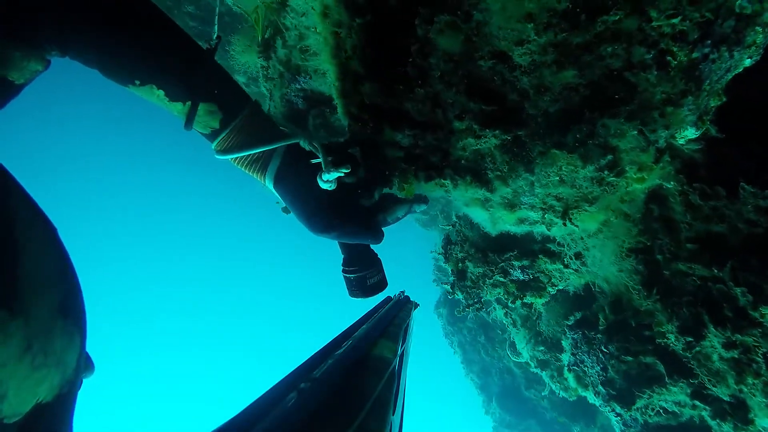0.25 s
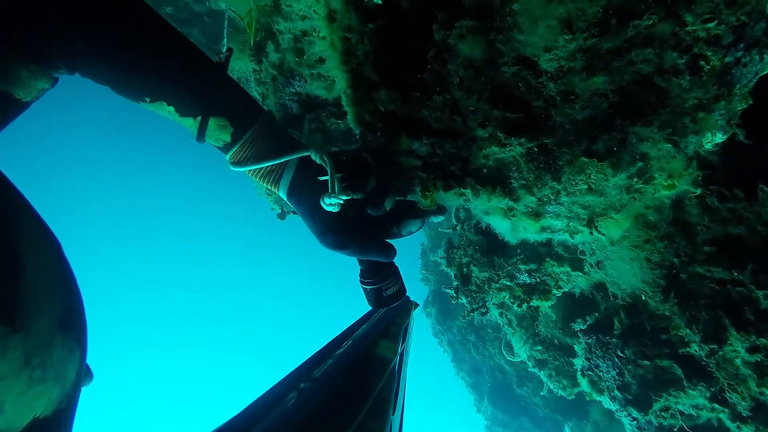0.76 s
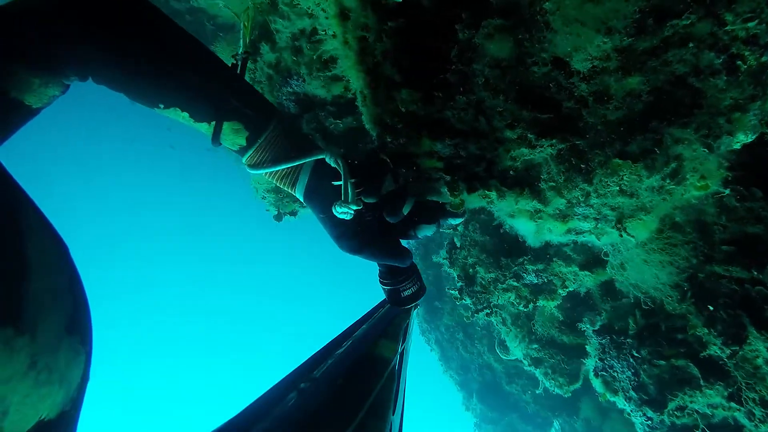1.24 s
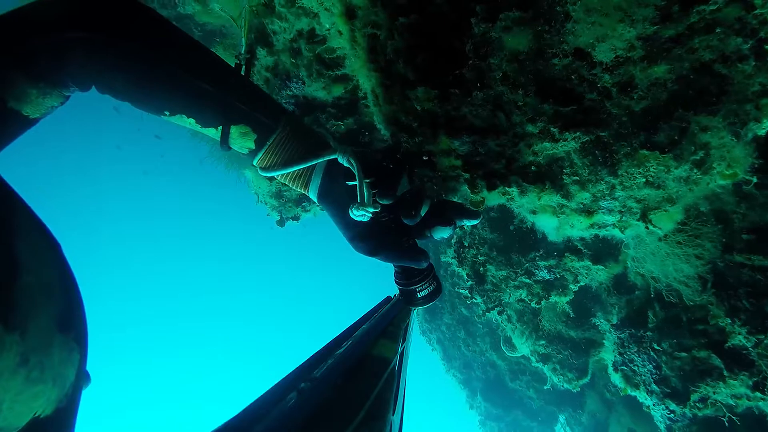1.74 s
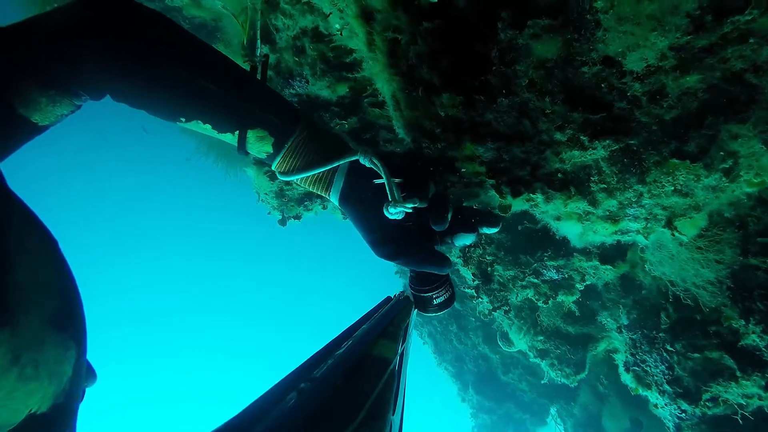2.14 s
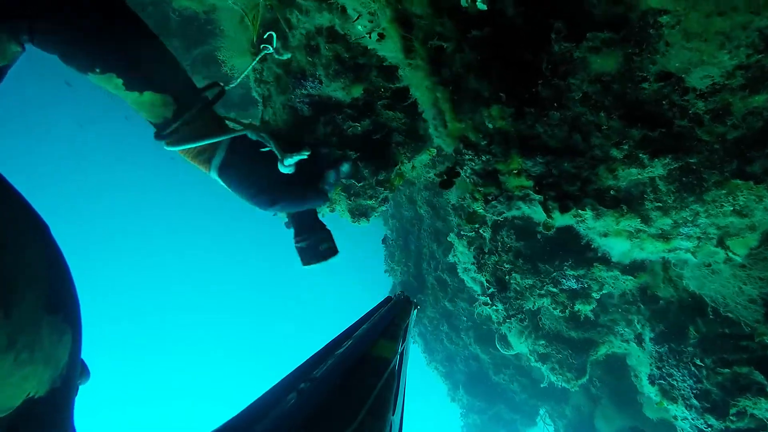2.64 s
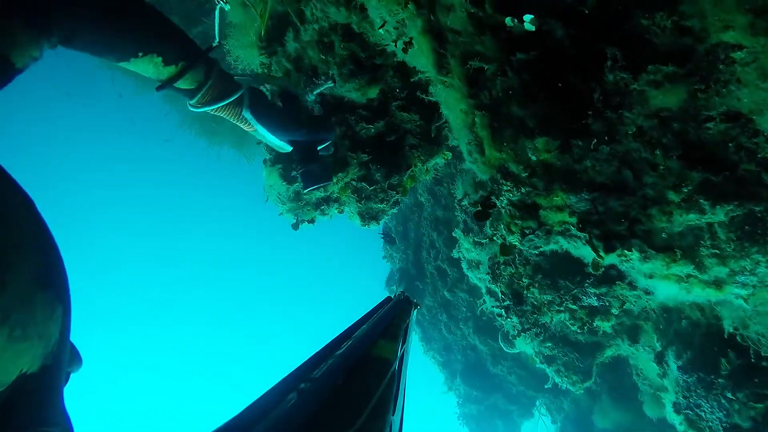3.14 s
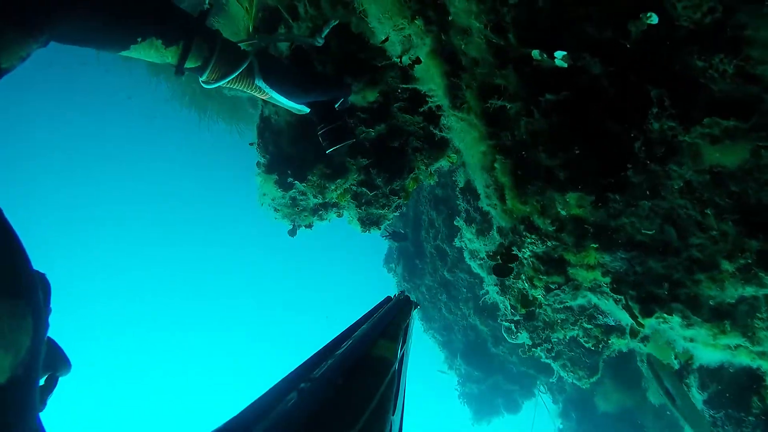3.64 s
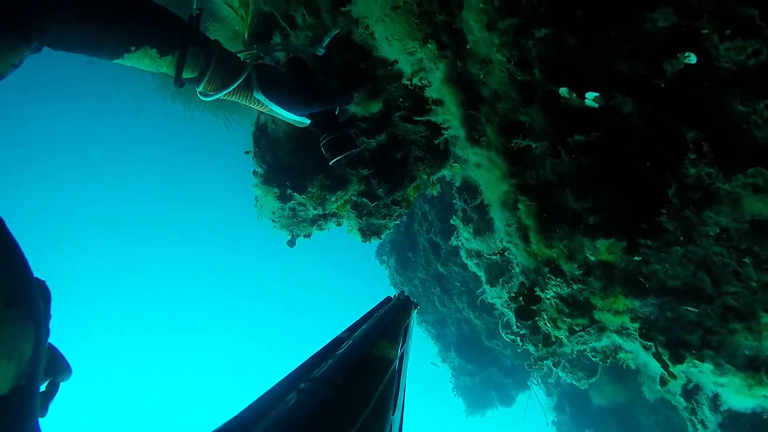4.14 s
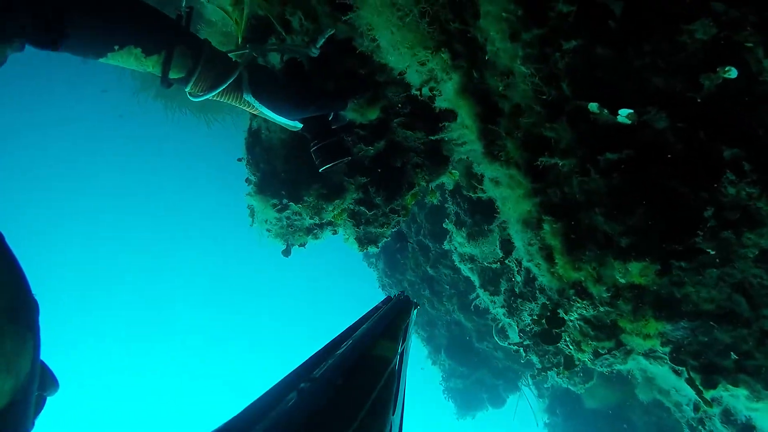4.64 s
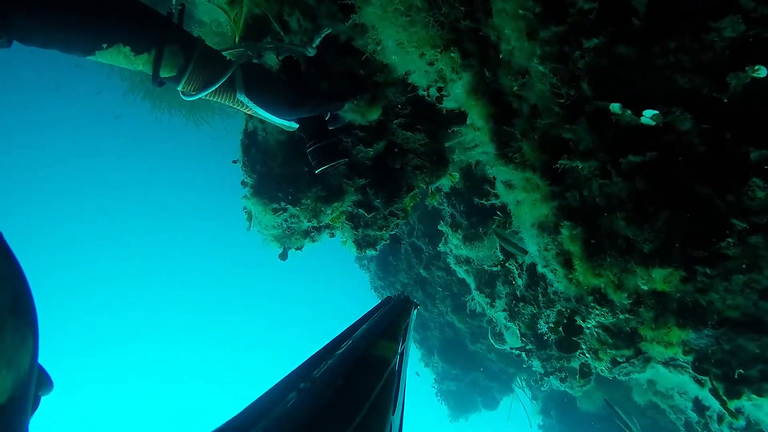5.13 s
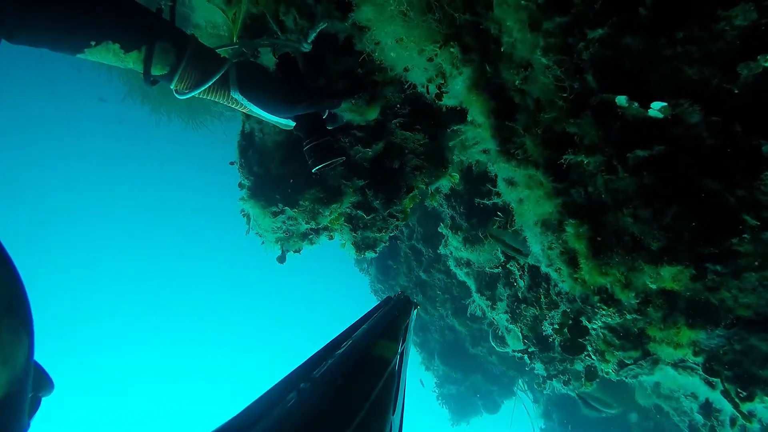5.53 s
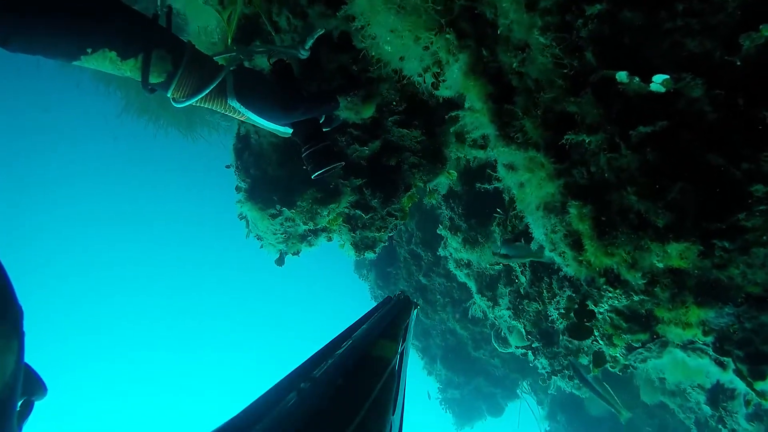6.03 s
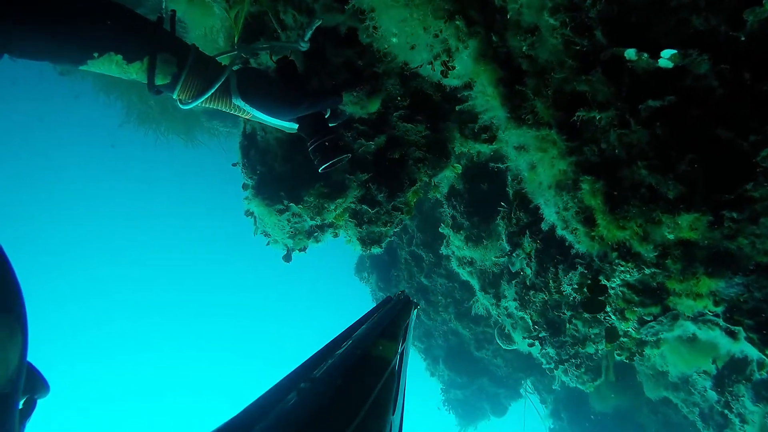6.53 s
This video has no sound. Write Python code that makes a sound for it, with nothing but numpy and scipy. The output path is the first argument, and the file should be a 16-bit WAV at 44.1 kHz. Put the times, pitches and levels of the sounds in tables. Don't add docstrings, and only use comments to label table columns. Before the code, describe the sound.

A diver's gloved hand grips a rock on a reef. Dry shrimp clicks, near and far, crackle throughout over muffled swell and faint hiss. Soft bumps and air plops come first, with a fluttering electronic buzz; a heavy hollow thump follows, ringing low for under a second. Afterwards come gritty scrapes, muted knocks, clustered snaps and quiet. The close microphone is enclosed in a case.

```python
import sys
import numpy as np
from scipy import signal
from scipy.fft import rfft, irfft, next_fast_len
from scipy.io import wavfile
from scipy.ndimage import uniform_filter1d, map_coordinates

SR = 44100
rng = np.random.default_rng(int(sys.argv[2]) if len(sys.argv) > 2 else 0)


def voltage_ratio(decibels):
    exponent = np.asarray(decibels, float) / 20
    return 10 ** exponent


def master_out(mix):
    frames = np.transpose(np.atleast_2d(mix))
    ceiling = np.clip(frames, -1, 1)
    pcm = np.round(ceiling * 32767).astype(np.int16)
    wavfile.write(sys.argv[1], SR, pcm)


N = 298998

# (frequency [Hz], level [dB], rise [s], t60 [s])
POLE_MODES = [(54.4, -23.5, .012, 1), (79.8, -13, 0.032, 0.67), (105.8, -9.5, 0.046, 0.7),
              (136.6, -20.5, .004, 0.27), (153, -21.5, 0.0034, 0.55), (173.6, -29, .003, 0.39),
              (226, -25.5, 0.0034, 0.17), (252.2, -16, 0.012, 0.2), (430, -23, 0.001, 0.035),
              (516, -23, 0.0017, 0.11), (674, -24, 0.00089, 0.096), (850, -36, .0015, 0.055),
              (1050, -34, .0015, 0.054)]
# (time [s], level [dB])
REBOUNDS = [
    (2.468, -14.5),
    (2.488, -19),
    (2.507, -16.5),
    (2.533, -15),
]
# (time [s], peak level [dB], frequency [Hz], rise [s],
# t60 [s])
SHOVES = [(2.4256, -32, 530, 0.0021, 0.016), (2.432, -23.5, 195, .003, .04),
          (2.428, -20.5, 103, .0043, 0.053), (2.435, -16.5, 41.6, .00274, 0.24),
          (2.438, -16.5, 430, 0.0014, 0.031), (2.44, -18.5, 660, 0.00081, 0.018),
          (2.4498, -18, 124, .002, 0.021), (2.53, -36, 236, .006, 0.094), (2.605, -41, 227, 0.0047, 0.062),
          (2.69, -48, 234, .005, 0.067), (2.812, -41, 61.7, .008, .12), (2.571, -28, 29.2, 0.027, 0.76),
          (2.832, -34, 30.2, 0.014, 0.72), (3.636, -36, 71.6, 0.0043, 0.054),
          (3.627, -40, 190, .002, 0.019), (3.646, -37, 150, .003, .03), (2.47, -39, 340, 0.0036, .15),
          (3.6345, -21, 144, 0.0058, 0.024)]
# (time [s], peak level [dB], frequency [Hz])
BUMPS = [(.208, -54, 127), (1.19, -45.5, 164), (1.195, -49, 270), (1.441, -37, 168), (1.444, -39.5, 417),
         (1.494, -36.5, 160), (1.51, -38.5, 126), (1.51, -43, 276), (2.913, -39.5, 109), (2.969, -37, 155),
         (3.205, -46.5, 157), (3.382, -39.5, 135), (3.383, -49, 517), (3.598, -48, 250), (3.63, -46, 560),
         (3.917, -41.5, 153)]
# (time [s], peak level [dB], upper edge [Hz])
CRACKS = [
    (1.446, -47.5, 6000),
    (2.4502, -24, 3500),
    (2.451, -21.5, 15000),
    (2.4532, -24, 5500),
    (2.4555, -31, 3000),
    (.937, -51.5, 5000),
    (1.008, -54, 5000),
]
# (frequency [Hz], width [Hz], level [dB])
CRACK_MODES = [(1290, 350, -4.5), (1760, 140, 3), (2190, 220, 1.5), (2800, 730, -6.5), (3930, 350, -7.5),
               (4950, 280, -11), (6950, 450, -11.5), (12200, 5000, -19)]
# (time [s], peak level [dB], frequency [Hz], top level [dB])
NEAR_SNAPS = [(.3535, -39.5, 6040, -23), (.832, -37.5, 4600, -29), (1.309, -41, 5750, -20),
              (1.3476, -35, 4570, -13), (1.4054, -40, 4030, -8.5), (1.4376, -34, 5640, -30),
              (1.354, -41, 5000, -8.5), (2.0947, -46, 7000, -14), (2.237, -41, 5470, -22),
              (2.3578, -31, 4930, -13.5), (2.4742, -40, 2900, -30), (4.027, -45, 3200, -8),
              (4.2275, -50, 5200, -20), (4.094, -48, 5600, -25), (2.468, -48, 2900, -30),
              (2.484, -51, 5500, -30), (2.4545, -36, 5000, -25), (2.5012, -26.5, 5030, -26),
              (2.5184, -42, 5300, -30), (2.7384, -40, 6800, -15), (3.4975, -42, 4600, -19),
              (4.0223, -29.5, 5360, -10.5), (4.0666, -38, 5820, -17), (4.0797, -44, 5800, -25),
              (4.0832, -41, 4500, -10), (1.3583, -47, 7900, -4), (4.197, -50, 7500, 3),
              (4.0585, -45, 5760, -5), (4.1316, -44, 5390, -2), (4.115, -44, 4000, -12),
              (4.1024, -35.5, 3240, -15), (4.1758, -33.5, 6800, -16), (4.2401, -29.5, 5430, -24),
              (4.299, -40, 5770, -18), (4.5522, -43, 5100, -26), (4.83, -32.5, 5530, -20),
              (6.0483, -37.5, 4700, -15), (6.1308, -35.5, 5850, -22), (6.4095, -34, 5400, -30),
              (6.4214, -35, 4560, -12), (6.5067, -31, 4170, -27), (6.597, -32.5, 5830, -12)]
# (time [s], peak level [dB], frequency [Hz])
OPEN_SNAPS = [(.0172, -43.5, 4530), (.0782, -45, 4960), (.1316, -45, 3860), (.193, -46, 5900),
              (.5767, -45.5, 4460), (.6888, -48.5, 4130), (.851, -43, 5490), (.8896, -42.5, 6860),
              (.9306, -43.5, 5160), (.9485, -43.5, 5600), (1.605, -40.5, 5890), (1.6703, -47, 4620),
              (1.7037, -42.5, 5640), (1.833, -47, 5110), (2.102, -42.5, 5660), (2.7606, -49, 4820),
              (2.9931, -49, 3050), (3.3678, -44, 6650), (4.2574, -50, 4320), (5.747, -45, 4950),
              (5.8122, -42, 6750), (5.9151, -46, 5640), (6.017, -46.5, 5990), (6.182, -44.5, 6710),
              (6.4334, -46, 4830), (6.4768, -49, 5610), (6.6621, -48, 6790)]
# (time [s], peak level [dB], frequency [Hz])
HIDDEN_SNAPS = [(.2428, -50, 6650), (.249, -45.5, 3080), (1.077, -48, 6000), (1.1987, -43.5, 5880),
                (1.2909, -46, 5660), (1.502, -45.5, 4270), (2.3271, -44, 4200), (2.7217, -46, 4610),
                (2.727, -41.5, 4700), (3.033, -46, 5420), (3.1612, -48, 5810), (3.733, -46.5, 4350),
                (3.7756, -49, 5780), (3.9175, -45.5, 5260), (3.973, -41.5, 4740), (4.097, -46, 3140),
                (4.3217, -45, 4650), (4.4265, -48, 3910), (4.549, -48, 4780), (4.6879, -47, 6970),
                (4.6032, -48.5, 4700), (5.5381, -43, 5500), (5.6232, -43, 4500), (5.6517, -46, 5630),
                (5.8417, -48.5, 5600), (6.1146, -44, 5560), (6.2812, -48.5, 4930), (6.5267, -43, 5740),
                (6.7247, -43, 6710), (6.7474, -43.5, 5450)]
# (time [s], peak level [dB], frequency [Hz])
FAINT_SNAPS = [(0.0364, -53, 6030), (0.198, -50, 4310), (0.2014, -50, 5470), (0.4282, -50, 3100),
               (0.4386, -49, 5990), (0.5399, -50, 5730), (0.7317, -52, 5680), (0.7556, -50, 3060),
               (0.8148, -50, 4260), (0.8992, -53, 5430), (1.0406, -52, 4310), (1.1107, -49, 4350),
               (1.2754, -51, 5210), (1.4207, -45, 4130), (1.8566, -50, 5680), (1.9288, -50, 5730),
               (2.0243, -48, 5000), (2.407, -50, 5730), (2.5449, -52, 5600), (2.6188, -47, 4820),
               (2.7482, -54, 4610), (3.0806, -52, 3060), (3.7406, -50, 4220), (3.7594, -50, 5560),
               (3.8112, -51, 6850), (3.815, -52, 4820), (3.9021, -52, 5600), (3.9544, -50, 5560),
               (3.9623, -50, 4570), (4.0878, -47, 3190), (4.2248, -52, 5340), (4.2801, -48, 2540),
               (4.3271, -46, 4610), (4.3733, -50, 5600), (4.3763, -51, 3060), (4.4877, -52, 3830),
               (4.5034, -52, 4780), (4.5375, -55, 4610), (4.5591, -50, 4480), (4.6543, -52, 5640),
               (4.7277, -49, 5860), (4.839, -48, 5600), (4.854, -53, 5940), (5.0489, -50, 4390),
               (5.2023, -52, 5860), (5.4002, -48, 5600), (5.4054, -51, 4610), (5.4824, -52, 5510),
               (5.6593, -45.5, 5770), (5.751, -45, 4780), (5.7602, -48, 4610), (5.7773, -41.5, 6850),
               (5.8242, -51, 5380), (5.9761, -50, 5170), (5.9828, -51, 5600), (6.2076, -55, 3140),
               (6.2573, -52, 5210), (6.3256, -50, 5730), (6.3475, -51, 5640), (6.3538, -51, 4090)]
# (frequency [Hz], width [Hz], level [dB])
CASE_MODES = [(1730, 300, -10), (2363, 210, -1), (3140, 250, 0.5), (3760, 730, -1.5), (4700, 750, 2),
              (5640, 600, 3), (6940, 570, -0.5)]
# (frequency [Hz], width [Hz], level [dB])
CASE_TOP_MODES = [(9960, 3200, 1), (13100, 1000, -9), (13600, 1500, -7)]
# (frequency [Hz], width [Hz], level [dB])
WALL_SHADOW = [(7900, 1300, -3)]
# (start [s], end [s], level [dB], frequency [Hz], top level [dB])
SCRAPES = [(1.448, 1.463, -64, 5170, -18), (2.353, 2.367, -54, 4740, -15), (2.464, 2.492, -61, 2600, -25),
           (2.509, 2.538, -61, 2160, -25), (2.502, 2.509, -50, 5000, -14.5), (2.72, 2.74, -62, 4700, -23),
           (3.49, 3.521, -51.5, 4700, -11), (3.527, 3.559, -56.5, 4700, -13),
           (3.573, 3.584, -63, 4700, -18), (3.912, 3.99, -70, 2280, -22), (3.965, 3.984, -64, 4700, -25),
           (4.082, 4.094, -61, 3140, -25), (4.102, 4.11, -58, 3140, -25), (4.116, 4.121, -63, 3140, -25),
           (2.519, 2.524, -59, 5460, -25), (4.309, 4.345, -62.5, 4700, -18.5),
           (4.49, 4.567, -66, 5030, -22), (4.487, 4.575, -69.5, 2350, -30),
           (4.957, 4.975, -65.5, 4640, -25), (5.743, 5.783, -59, 4700, -20)]
# (frequency [Hz], width [Hz], level [dB])
GRIT_TOP_MODES = [(10600, 1900, 0), (14000, 2500, -20)]
# (start [s], end [s], level [dB], frequency
# [Hz])
RUBS = [(0.024, .19, -66.5, 364), (0.803, 1.16, -71, 360), (1.357, 1.421, -64, 494),
        (2.458, 2.613, -50, 215), (2.493, 2.54, -63, 1170), (2.591, 2.732, -62.5, 547),
        (3.129, 3.292, -67, 340), (4.304, 4.498, -71.5, 430), (4.538, 4.578, -56.5, 555),
        (4.769, 4.82, -70, 435), (4.881, 5.093, -69, 444)]
# (time [s], peak level [dB], frequency [Hz])
PLOPS = [(.029, -48.5, 360), (.154, -45, 359), (.246, -47.5, 705), (.597, -48, 390), (.83, -46.5, 645),
         (.936, -43.5, 647), (1.007, -47, 660), (1.04, -42, 380), (1.112, -47, 355), (1.344, -47.5, 676),
         (1.441, -37, 593), (1.491, -35.5, 280), (2.052, -39, 645), (2.095, -49.5, 510), (2.243, -46, 630),
         (2.357, -46, 670), (2.616, -39.5, 677), (3.255, -43.5, 273), (3.178, -50, 344),
         (3.318, -44.5, 657), (3.378, -45, 278), (3.63, -36.5, 392), (3.823, -46, 504), (3.862, -47.5, 549),
         (3.921, -44, 285), (4.309, -47, 428), (4.538, -45, 400), (4.571, -36.5, 490), (4.768, -52, 444),
         (0.055, -49, 370), (0.176, -50, 674), (0.826, -49, 398), (0.881, -51, 660), (0.95, -47, 327),
           (0.988, -52, 686), (1.123, -47, 590), (1.375, -45, 320), (1.915, -50.5, 630), (2.137, -51, 680),
           (2.197, -50, 483), (2.377, -47, 650), (2.377, -48, 647), (2.414, -49, 610), (2.683, -45, 660),
           (2.9, -53, 640), (2.954, -49, 640), (3.017, -49, 320), (3.025, -50, 670), (3.24, -52, 370),
           (3.511, -51.5, 650), (3.927, -46.5, 510), (4.532, -47, 520), (4.621, -55, 510),
           (4.784, -51, 404)]
WHISTLE_HZ = [8631, 14087]
WHISTLE_DB = [-72.5, -89]
# (start [s], end [s], level [dB])
AWAKE = [
    (1.352, 2.362, -64.5),
    (6.41, 6.43, -76),
    (6.43, 6.78, -65),
    (6.445, 6.465, -68),
    (6.495, 6.543, -69),
]
# (start [s], end [s], level [dB])
BUSY = [(1.356, 1.371, -59), (1.411, 1.471, -55), (1.49, 1.607, -53.5), (1.657, 1.749, -53),
        (1.838, 1.921, -51.5), (1.933, 2.022, -52), (2.057, 2.135, -52), (2.236, 2.286, -52),
        (6.495, 6.543, -59), (6.656, 6.682, -53.5), (6.695, 6.714, -52.5)]
# (frequency [Hz], level per Hz [dB])
IDLE_SPECTRUM = [(8500, -7), (10300, -18), (10800, -12), (11050, -32), (11600, -7), (12300, -2),
                 (13250, -11), (14000, -4), (14400, -11), (15170, -9), (15400, -36)]
# (frequency [Hz], level per Hz [dB])
WORK_SPECTRUM = [(8500, -42), (10700, -26), (11050, -28), (11500, -6.5), (12150, -3), (12500, 7.5),
                 (12800, 0), (13150, -11), (13700, -11.5), (14500, -19), (15250, -29), (15400, -55)]
COIL_HZ = [11810, 14087, 10849]
COIL_DB = [-14, -10.5, -20]
# (time [s], peak level [dB])
SPIKES = [(1.449, -52), (1.5522, -50), (1.668, -53), (1.844, -55), (1.8654, -51), (1.9696, -51),
          (2.0689, -54), (2.0793, -52), (2.2443, -54), (6.7134, -55)]
# (frequency [Hz], width [Hz], level [dB])
SPIKE_MODE = [(11300, 1500, 0)]
# (time [s], slosh level [dB])
STIR = [(0, -68), (.68, -69.5), (1.05, -64.5), (2.34, -64), (3.36, -64.5), (3.79, -67), (4.32, -66),
        (5.51, -72.5), (6.78, -65.5)]
# (frequency [Hz], level per Hz [dB])
RUMBLE_SPECTRUM = [(12, -27), (20, 3.5), (43, -1.5), (59, -1), (101, -11), (226, -24.5), (300, -27),
                   (390, -71.5), (660, -120)]
# (frequency [Hz], level per Hz [dB])
SLOSH_SPECTRUM = [(120, -24), (250, -4), (370, -1.5), (520, -4), (680, 1), (780, -14.5), (1100, -19.5),
                  (2000, -35)]
# (frequency [Hz], level per Hz [dB])
HISS_SPECTRUM = [(410, -66.5), (700, -6.5), (850, -5), (1480, -6.5), (2560, -5.5), (3500, -7.5), (4800, -6),
                 (5800, -9), (7800, -11.5), (10500, -12.5), (14000, -15.5), (15250, -14.5), (15400, -55.5)]

BLOW_S = 2.437
GRIP_S, GRIP_T60 = 2.76, 0.22
BUMP_RISE, BUMP_LIFE = 0.58, 7.3
OPEN_TOP_DB, HIDDEN_TOP_DB, FAINT_TOP_DB = -11, -21, -18
SNAP_LOW_HZ = 2600
ECHO_S, ECHO = 0.000801, .3
WALL_HZ, TOP_WALL_HZ = 7550, 12800
RUB_WIDTH = .28
PLOP_T60 = 0.051
FRAME_HZ, FRAME_END_S = 59.94, 1.4712
LOAD_EDGE_S = 0.0065
WARM_HZ, WARM_S = 180, .35
RUMBLE_DB, RUMBLE_FOLLOWS, HISS_DB = -52, 0.17, -66
SPLASH_DB, SPLASH_S = 15, 0.067
SURGE_DB, SURGE_S = 8.5, 0.31
TOP_HZ = 15700


def unit(x):
    return x / np.sqrt(np.mean(x ** 2, axis=-1, keepdims=True) + 1e-20)


def wobble(rate):
    knots = rng.standard_normal(int(N * rate / SR) + 4)
    return map_coordinates(knots, [np.arange(N) * rate / SR])


def filtered(x, response):
    m = next_fast_len(x.shape[-1] + 8192)
    spectrum = rfft(x, m) * response(np.fft.rfftfreq(m, 1 / SR))
    return irfft(spectrum, m)[..., :x.shape[-1]]


def noise(spectrum):
    hz, db = np.transpose(spectrum)
    shape = lambda f: voltage_ratio(np.interp(np.log(f + 1), np.log(hz), db, -120, -120))
    return unit(filtered(rng.standard_normal(N), shape))


def resonances(modes):
    def response(f):
        total = 0
        for k, (hz, width, db) in enumerate(modes):
            damping = 1j * f * width
            total = total + (-1) ** k * voltage_ratio(db) * damping / (hz * hz - f * f + damping)
        return total
    return response


def ring(hz, rise, t60, t):
    return np.sin(2 * np.pi * hz * t) * voltage_ratio(-60 * t / t60) * (1 - np.exp(-t / rise)) ** 2


def peaked(sound):
    return sound / np.abs(sound).max()


def add(track, s, sound):
    part = track[round(s * SR):][:len(sound)]
    part += sound[:len(part)]


def spans(rows, t):
    return sum(voltage_ratio(db) * ((t > start) & (t < end)) for start, end, db in rows)


def stroke(start, end):
    return np.sin(np.pi * np.linspace(0, 1, round((end - start) * SR)) ** 0.78) ** 0.28


def coloured(spit, hz, width, top_db, spread, top):
    wall = lambda f, edge_hz: 1 / (1 - (f / edge_hz) ** 2 + 1.4j * f / edge_hz)
    near = resonances([(hz, width, 0)])
    body = filtered(spit[0], lambda f: resonances(CASE_MODES)(f) * (spread + near(f)) * wall(f, WALL_HZ))
    highs = filtered(spit[1], lambda f: resonances(top)(f) * wall(f, TOP_WALL_HZ) ** 2)
    return unit(body) + voltage_ratio(top_db) * unit(highs)


def pole():
    out, t = np.zeros(N), np.arange(SR) / SR
    held = voltage_ratio(-60 * np.maximum(BLOW_S + t - GRIP_S, 0) / GRIP_T60)
    sway = np.zeros(SR)
    upper = np.zeros(SR)
    for hz, db, rise, t60 in POLE_MODES:
        mode = ring(hz, rise, t60, t)
        sway += voltage_ratio(db + 1.3 * wobble(22)[:SR]) * mode
        if hz > 400:
            upper += voltage_ratio(db + 20.0) * mode
    add(out, BLOW_S, held * sway)
    for s, db in REBOUNDS:
        add(out, s, voltage_ratio(db - 16.5) * upper)

    bumps = [(s, db, hz, BUMP_RISE / hz, BUMP_LIFE / hz) for s, db, hz in BUMPS]
    for s, db, hz, rise, t60 in SHOVES + bumps:
        add(out, s, voltage_ratio(db) * peaked(ring(hz, rise, t60, t)))

    short = t[:2000]
    for s, db, edge_hz in CRACKS:
        contact = rng.standard_normal(2000) * voltage_ratio(-60 * short / .008)
        contact[0] += 12
        crack = filtered(contact, lambda f: resonances(CRACK_MODES)(f) / (1 + 1j * f / edge_hz) ** 3)
        add(out, s, voltage_ratio(db) * peaked(crack))
    return out


def shrimp():
    out, t = np.zeros(N), np.arange(1500) / SR
    decay = voltage_ratio(-60 * t / 0.003) + voltage_ratio(-24.5 - 60 * t / 0.023)
    shape = decay * (1 - np.exp(-t / 0.00039))
    snaps = list(NEAR_SNAPS)
    for rows, top_db in ((OPEN_SNAPS, OPEN_TOP_DB), (HIDDEN_SNAPS, HIDDEN_TOP_DB),
                         (FAINT_SNAPS, FAINT_TOP_DB)):
        snaps += [(*row, top_db) for row in rows]
    for s, db, hz, top_db in snaps:
        spit = rng.standard_normal((2, len(t)))
        late, low = rng.random(2)
        spit[:, 6] = 11
        low_hz = SNAP_LOW_HZ * (1 - .25 * low)
        delay = ECHO_S * (0.249 + 0.748 * late)

        def path(f):
            echo = 1 - ECHO * np.exp(-2j * np.pi * f * delay)
            return echo / (1 - (low_hz / (f + 1)) ** 2 - 1.2j * low_hz / (f + 1))

        snap = filtered(coloured(spit * shape, hz, 1500, top_db + 6.5, 0.84, CASE_TOP_MODES), path)
        add(out, s, voltage_ratio(db - 1.5) * peaked(snap))
    return filtered(out, lambda f: 1 - resonances(WALL_SHADOW)(f))


def grit():
    out = np.zeros(N)
    for start, end, db, hz, top_db in SCRAPES:
        swell = np.pad(stroke(start, end), (0, 400))
        n = len(swell)
        body_db = 3 * wobble(598)[:n]
        highs_db = 5 * wobble(200)[:n] - np.linspace(0, 6, n)
        grains = voltage_ratio([body_db, highs_db]) * swell * rng.standard_normal((2, n))
        add(out, start, voltage_ratio(db) * coloured(grains, hz, 800, top_db - 1, 0.18, GRIT_TOP_MODES))
    return out


def suit():
    out = np.zeros(N)
    for start, end, db, hz in RUBS:
        swell = np.pad(stroke(start, end), (0, 900))
        n = len(swell)
        drag = voltage_ratio(4.8 * wobble(37.8)[:n]) * swell * rng.standard_normal(n)
        hum = filtered(drag, lambda f: resonances([(hz, RUB_WIDTH * hz, 0)])(f) ** 2)
        add(out, start, voltage_ratio(db) * unit(hum))
    return out


def plops():
    out, t = np.zeros(N), np.arange(SR // 5) / SR
    for s, db, hz in PLOPS:
        add(out, s, voltage_ratio(db - 7.5) * peaked(ring(hz, 0.0016, PLOP_T60, t)))
    return out


def circuits():
    t = np.arange(N) / SR
    frame, phase = np.divmod((t - FRAME_END_S) * FRAME_HZ, 1)
    first_load = (t > AWAKE[0][0]) & (t < AWAKE[0][1])
    loaded = first_load | (t > AWAKE[1][0])

    whistle = np.zeros(N)
    for hz, db in zip(WHISTLE_HZ, WHISTLE_DB):
        level = voltage_ratio(db + 0.99 * wobble(16))
        whistle += level * np.sin(2 * np.pi * hz * t + 0.53 * wobble(6.2))
    whistle *= 1 + 0.62 * first_load
    whistle *= 1 - 0.49 * (phase < .15) * loaded

    middle = FRAME_END_S + (frame + .6) / FRAME_HZ
    gate = uniform_filter1d(0.077 + np.clip((phase - .1) / 0.2, 0, 1), size=40)
    scatter = voltage_ratio(0.51 * rng.standard_normal(600)[frame.astype(int) + 100])
    coil = sum(voltage_ratio(db) * np.sin(2 * np.pi * hz * t + .6 * wobble(8)) for hz, db in zip(COIL_HZ, COIL_DB))
    idle = spans(AWAKE, middle) * (noise(IDLE_SPECTRUM) + coil)

    starts = (BUSY[1][0], AWAKE[1][0])
    cold = sum(np.exp(-np.maximum(t - start, 0) / WARM_S) * (t > start) for start in starts).clip(0, 1)
    cold_noise = noise([(hz + WARM_HZ, db) for hz, db in WORK_SPECTRUM])
    work = np.sqrt(cold) * cold_noise + np.sqrt(1 - cold) * noise(WORK_SPECTRUM)
    load = uniform_filter1d(spans(BUSY, t), round(LOAD_EDGE_S * SR))
    return whistle + gate * (idle + scatter * load * work)


def spikes():
    out, t = np.zeros(N), np.arange(400) / SR
    for s, db in SPIKES:
        burst = rng.standard_normal(len(t)) * voltage_ratio(-60 * t / .005)
        tick = filtered(burst, lambda f: resonances(SPIKE_MODE)(f) ** 2)
        add(out, s, voltage_ratio(db) * peaked(tick))
    return out


def sea():
    t = np.arange(N) / SR
    stir_db = np.interp(t, *np.transpose(STIR))

    def wake(peak_s):
        since = np.maximum(t - BLOW_S, 0) / peak_s
        return (since * np.exp(1 - since)) ** 2

    rumble_db = RUMBLE_DB + RUMBLE_FOLLOWS * (stir_db - stir_db.mean()) + SURGE_DB * wake(SURGE_S)
    rumble = voltage_ratio(rumble_db) * noise(RUMBLE_SPECTRUM)
    lumps = voltage_ratio(1.7 * wobble(6) + 2.4 * wobble(35))
    slosh = voltage_ratio(stir_db + SPLASH_DB * wake(SPLASH_S)) * unit(lumps * noise(SLOSH_SPECTRUM))
    hiss = voltage_ratio(HISS_DB) * noise(HISS_SPECTRUM)
    hits = rng.random(N) < 110 / SR
    strength = voltage_ratio(4 * rng.exponential(size=N).clip(0, 1.3))
    far = hits * strength * rng.standard_normal(N)
    return rumble + slosh + hiss + voltage_ratio(-80) * unit(filtered(far, resonances(CASE_MODES)))


def scene():
    return (pole() + shrimp() + grit() + suit() + plops() + circuits() + spikes() + sea())[None]


def roll_off(x):
    return signal.sosfilt(signal.butter(12, 16430, fs=SR, output="sos"), x)


def record(dry):
    mix = filtered(dry, lambda hz: voltage_ratio(-30 * np.clip((hz - TOP_HZ) / 700, 0, 3)))
    return roll_off(mix)


dry = scene()
out = record(dry)
master_out(out)
```